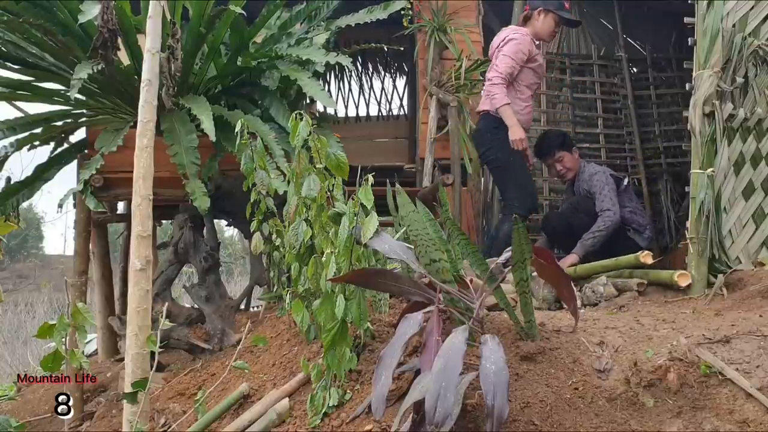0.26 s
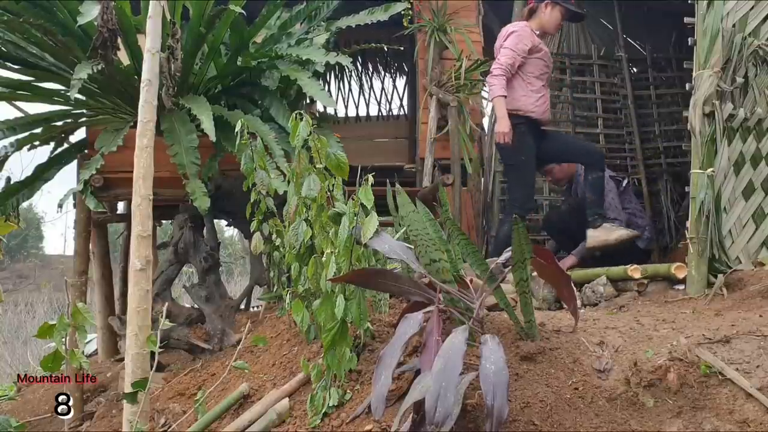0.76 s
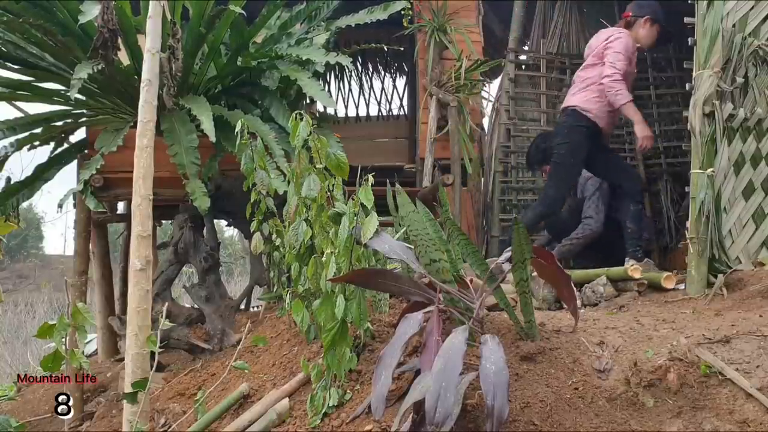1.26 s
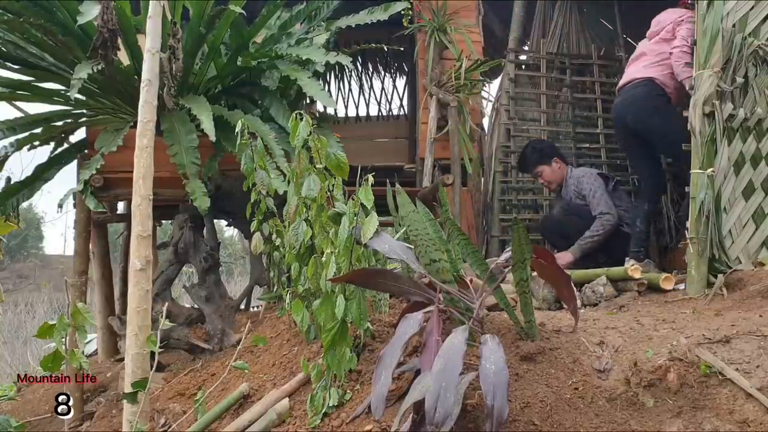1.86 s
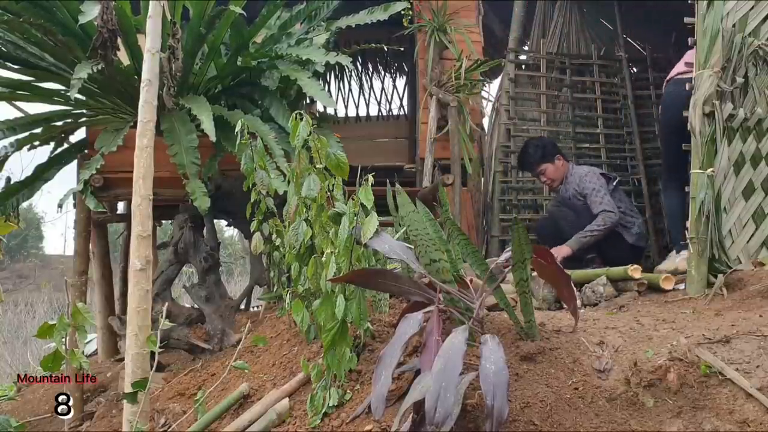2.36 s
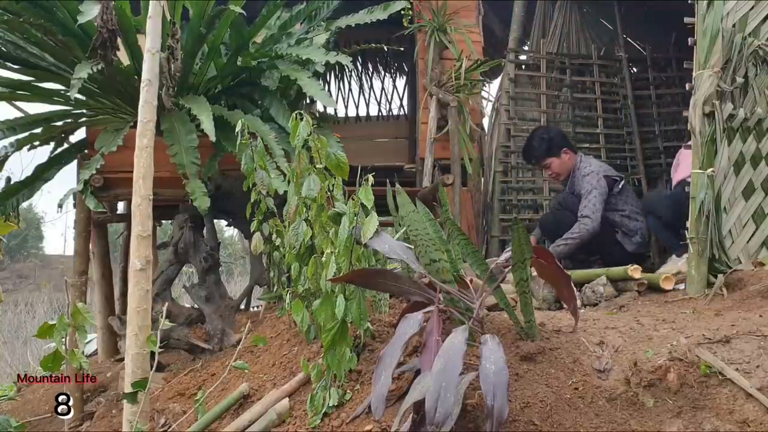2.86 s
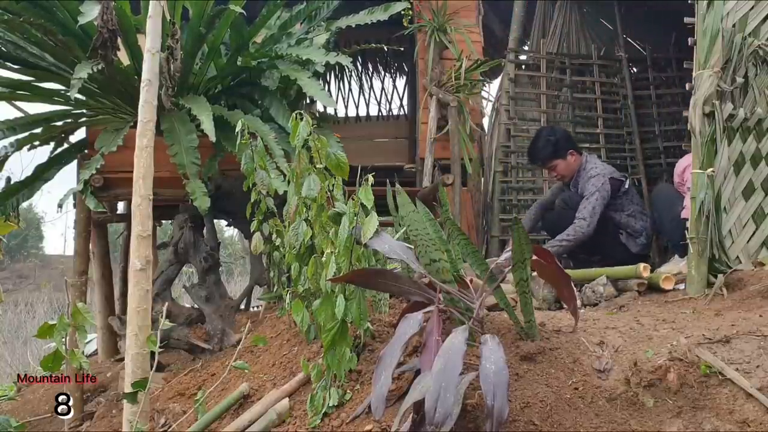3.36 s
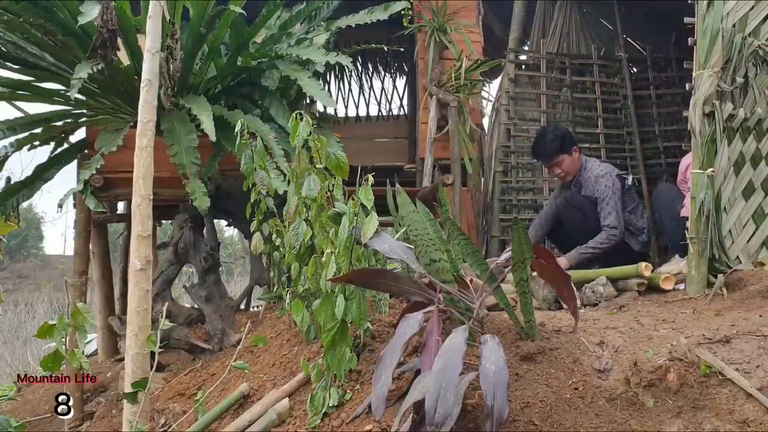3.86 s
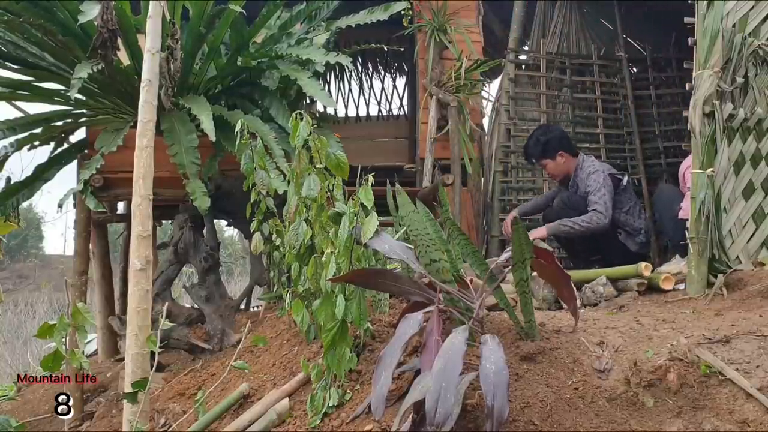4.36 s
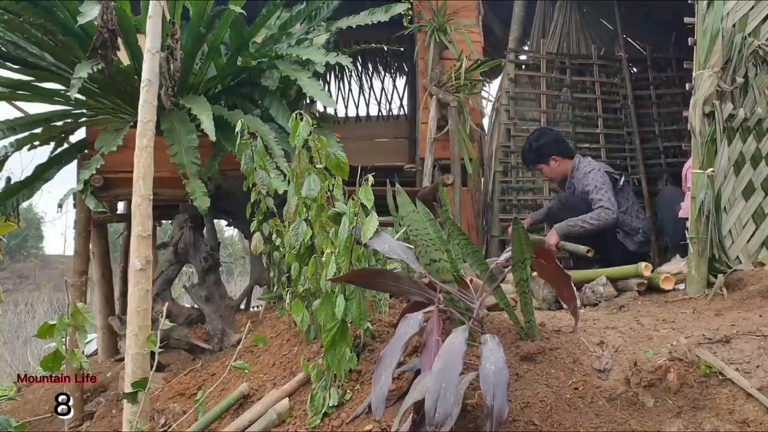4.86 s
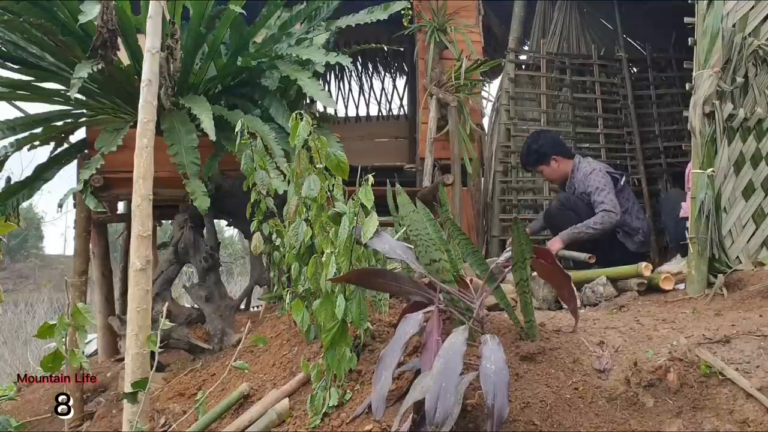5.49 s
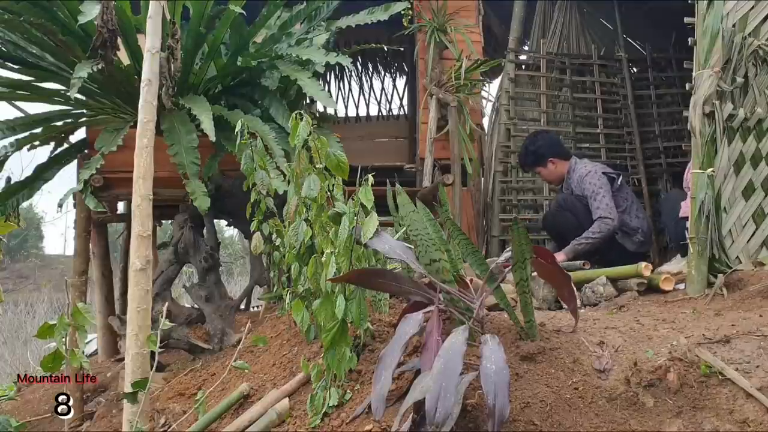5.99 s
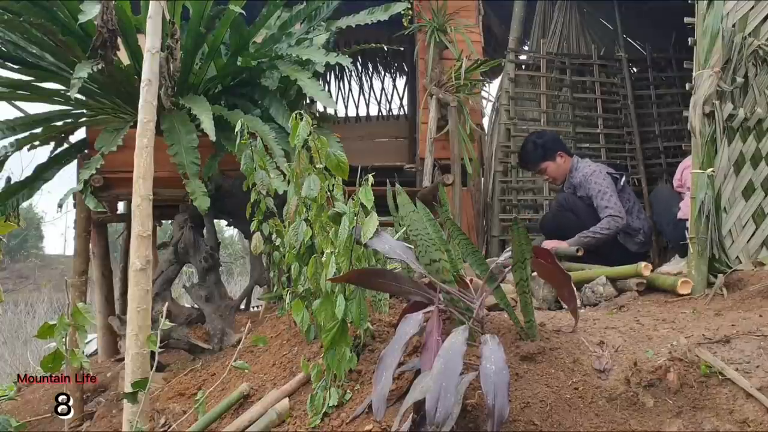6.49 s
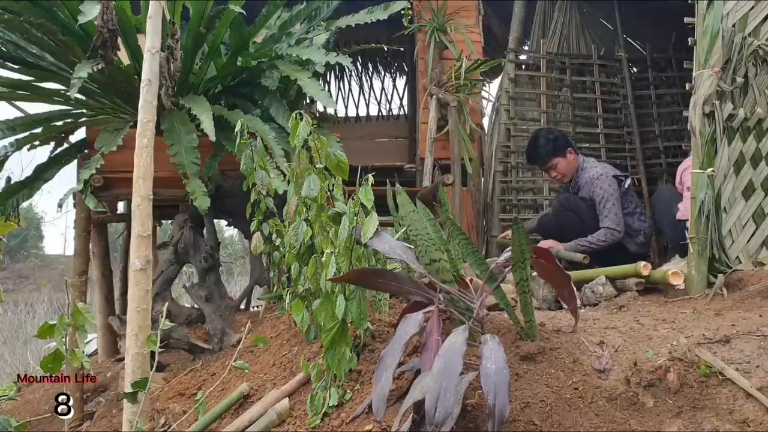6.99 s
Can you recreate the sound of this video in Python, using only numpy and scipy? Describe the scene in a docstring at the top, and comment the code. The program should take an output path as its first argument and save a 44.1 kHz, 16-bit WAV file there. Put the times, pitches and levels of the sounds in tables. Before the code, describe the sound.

A steady crackling, hissing patter like a small fire sits off to the right. A warbler trills at the start as hollow bamboo knocks and thumps on dry earth. A few lighter taps follow, then the hardest cluster of clacks and thuds at three and a half seconds. A second, softer trill comes next, then six very faint low hoots among final knocks. Open air, stereo phone microphone.

```python
"""A warbler trills over a crackling, hissing patter like a small fire, off to the right all through.
Hollow bamboo tubes, ringing air columns with clacking walls, knock, drag and thump on dry earth from 0.2 s.
The hardest blows come near 3.5 s, then a second trill; six soft hoots follow from 5.1 s, among and before
the last knocks, to 7.1 s. Trills and hoots are gliding sines; coloured noise is a faint open-air rumble."""
import sys
import numpy as np
from scipy import signal
from scipy.fft import rfft, irfft, next_fast_len
from scipy.io import wavfile
from scipy.ndimage import uniform_filter1d

SR = 44100
rng = np.random.default_rng(int(sys.argv[2]) if len(sys.argv) > 2 else 0)


def unload_audio(sound):
    """Save the sound as a 16-bit wav file, at the path given as the first command line argument."""
    columns = np.transpose(np.atleast_2d(sound))
    # keep every value between -1 and 1, then stretch to whole-number steps
    steps = np.round(np.clip(columns, -1, 1) * 32767)
    wavfile.write(sys.argv[1], SR, steps.astype(np.int16))


N = 318843
SNAP_T60_S = 0.01  # sharp head of a pop


def tube(name, modes, rattle_db, spread_oct, swell, mouth):
    """A blow rings the air column until gripped or laid still; contacts rattle it and clack the wall."""
    # blows: t/s, tube, level/dB, free ringing/s, favoured f/Hz
    knocks = [(0.169, "long", -45.5, 0.0039, 690), (0.179, "long", -39.5, 0.032, 930),
              (0.197, "long", -36.5, 0.011, 800), (0.202, "long", -40.5, 0.013, 420),
              (0.237, "long", -54.5, 0.034, 397), (0.553, "short", -39.5, 0.016, 520),
              (0.575, "short", -41, 0.033, 474), (0.742, "long", -67, 0.022, 387),
              (1.312, "long", -49, 0.076, 390), (2.467, "long", -60.5, 0.0057, 211),
              (3.462, "short", -30.5, 0.053, 754), (3.52, "short", -41, 0.035, 480),
              (3.551, "short", -34.5, 0.02, 960), (3.559, "short", -31.5, 0.044, 580),
              (3.622, "short", -36.5, 0.031, 800), (3.657, "short", -37, 0.02, 570),
              (3.684, "short", -41, 0.03, 515), (3.725, "short", -52.5, 0.033, 586),
              (5.864, "long", -50, 0.023, 536), (6.334, "long", -45.5, 0.046, 505),
              (6.407, "long", -62.5, 0.03, 410), (6.447, "long", -49.5, 0.033, 960),
              (6.476, "long", -62, 0.007, 426), (7.097, "short", -42, 0.027, 615),
              (7.105, "long", -50, 0.084, 614)]
    # woody clack between the modes: f/Hz, relative gain/dB
    wall_colour = [(60, -13), (250, -10), (900, -12.5), (2500, -8.5), (5000, -10)]
    grip_cycles = 13  # a gripped mode falls to 1/e over this many cycles
    # clack relative to ring at a firm blow; gentler touches are more clack than ring
    firm_db, clack_at_firm_db, clack_db_per_db = -40, -9, 0.2754
    column, wall = np.zeros(N), np.zeros((2, N))
    t = np.arange(SR // 3) / SR
    for s, which, db, free_s, pitch_hz in knocks:
        if which != name:
            continue
        late = np.maximum(t - free_s, 0)
        touches = rng.standard_normal(len(t)) * (rng.random(len(t)) < 0.03)
        force = undb(rattle_db) * touches * (t < free_s) * np.exp(-t / 0.12)
        force[0] = 1
        shift_hz = np.interp(s + t, *np.transpose(mouth))
        bend = np.exp(2j * np.pi * np.cumsum(shift_hz) / SR)
        rise = np.minimum(t / (0.002 + swell * free_s), 1)  # a tube rolled down swells in
        ring = np.zeros(len(t))
        for hz, mode_db, t60 in modes:
            detune = 1 + 0.006 * rng.standard_normal()
            # place and hardness of the contact favour the modes near one pitch
            favour = undb(mode_db) / (1 + (np.log2(hz / pitch_hz) / spread_oct) ** 2)
            grip = np.exp(-late * hz / grip_cycles)
            ring += favour * resonate(force, hz * detune, t60, bend) * grip
        add(column, s, undb(db) * ring * rise)

        # a low knock is a soft, long push, so its clack is dull
        push = np.hanning(int(0.4 * SR / pitch_hz) + 3)
        rough = rng.standard_normal(len(t)) + 0.72 * rng.standard_normal((2, len(t)))
        rough *= np.exp(-t / 0.024) + 2.6 * np.exp(-late / 0.067 - t / 0.073)
        clack = signal.lfilter(push / push.sum(), [1], rough)
        clack_db = clack_at_firm_db + clack_db_per_db * (firm_db - db)
        add(wall, s, undb(db + clack_db) * rise * clack)
    return column + colour(wall, wall_colour)


def ground():
    """Dull thumps: a soft swing of the earth, about two cycles long, a little unlike at the two ports."""
    # feet and tubes on the earth: t/s, level/dB, f/Hz
    thuds = [(0.195, -31.5, 171), (1.41, -41, 52), (2.482, -61.5, 70.6), (3.482, -35, 68),
             (3.548, -36.5, 127), (3.552, -25.5, 287), (3.579, -39.5, 113.3), (3.679, -47, 131),
             (7.051, -49, 66.4), (7.072, -42, 69), (7.132, -40.5, 90)]
    out = np.zeros((2, N))
    for s, db, hz in thuds:
        turns = np.arange(SR // 5) / SR * hz
        swing = np.sin(2 * np.pi * turns + 0.1 * rng.standard_normal((2, 1)))
        add(out, s, undb(db) * swing * 8.2 * turns ** 2 * np.exp(-turns / 0.37))
    return out


def loud_pops():
    """Each pop is a noise snap with fading tails, plus its own short resonance."""
    # t/s, level/dB, resonance f/Hz
    crackles = [(0.596, -34, 9800), (0.832, -34.5, 11400), (1.0763, -41, 5460), (1.211, -43, 8950),
                (1.255, -34.5, 9800), (1.294, -38, 12200), (1.4654, -34, 7500), (1.591, -41, 6700),
                (1.9117, -38.5, 6040), (1.995, -31.5, 6500), (2.0862, -28, 5840), (2.2187, -46, 8900),
                (2.2656, -42, 5700), (2.3258, -39.5, 10700), (2.514, -33, 10500), (2.529, -37, 8050),
                (2.553, -30.5, 5300), (2.584, -38.5, 10100), (2.694, -37.5, 8900), (2.9618, -44, 10300),
                (3.012, -40.5, 11500), (3.1305, -39, 6700), (3.162, -37, 7200), (3.464, -35, 7200),
                (3.493, -36, 10700), (3.612, -35, 10800), (3.736, -44, 11200), (3.779, -43, 11500),
                (4.0926, -30, 5500), (4.158, -38, 5830), (4.1734, -38.5, 10100), (4.3436, -28.5, 4900),
                (4.4747, -33, 5200), (4.546, -41, 10100), (5.126, -38, 9300), (5.221, -34, 5240),
                (5.24, -30, 5200), (5.5118, -39.5, 7500), (5.6137, -35.5, 11600), (5.766, -40, 9000),
                (5.835, -44, 8000), (6.072, -42.5, 8030), (6.2545, -41, 9950), (6.333, -39.5, 7000),
                (6.4393, -44.5, 8900), (6.483, -33, 9800), (6.56, -40, 5000), (6.8285, -39, 9850),
                (6.978, -40.5, 9700)]
    out, size = np.zeros((2, N)), SR // 6
    shape = fade(size, SNAP_T60_S) + 0.4 * fade(size, 0.06) + 0.08 * fade(size, 0.3)
    for s, db, hz in crackles:
        burst = shape * (rng.standard_normal(size) * 0.72 + rng.standard_normal((2, size)) * 0.86)
        burst[:, :3] += 4.1 * np.array([1, -1, 0.3])
        ring = resonate(burst, hz, 12.0 / hz) / np.sqrt(SR / hz)  # t60 of 12 cycles
        add(out, s, undb(db) * (0.62 * burst + 0.51 * ring))
    return out


def deep_ticks():
    """Each tick is a pulse with a little noise, ringing one quickly damped mode."""
    # t/s, level/dB, mode f/Hz
    tick_hits = [(0.099, -46.5, 2520), (0.613, -36, 3400), (1.265, -44, 2540), (1.4686, -46, 2470),
                 (1.559, -41, 2760), (2.086, -32.5, 3250), (2.2193, -32.5, 2780), (2.327, -40, 2900),
                 (2.649, -37, 3660), (2.6765, -46, 2470), (3.606, -33.5, 2400), (3.6429, -30.5, 2200),
                 (4.094, -28, 2440), (4.281, -42.5, 2810), (5.027, -42.5, 2580), (5.221, -45.5, 2560),
                 (5.238, -36, 3300), (5.5143, -48, 2180), (6.273, -49.5, 2720), (6.29, -48.5, 2530),
                 (6.999, -43, 2780), (7.0206, -41.5, 2500), (7.055, -43, 2560)]
    out, size = np.zeros((2, N)), SR // 6
    for s, db, hz in tick_hits:
        noise = rng.standard_normal(size) * 0.07 + rng.standard_normal((2, size)) * 0.035
        burst = fade(size, 0.06) * noise
        burst[:, 0] += 1
        add(out, s, undb(db) * (resonate(burst, hz, 0.0055) + burst))
    return signal.sosfilt(signal.butter(3, 1500, "high", fs=SR, output="sos"), out)


def sizzle_and_rustle():
    """Steady noise swollen by small pops: a two-band sizzle and a rustle, both yet to be coloured."""
    # t/s, sizzle level/dB, deeper rustle level/dB
    levels = [(0.0, -59.5, -84.5), (2.76, -58.5, -80.5), (2.92, -63, -85), (3.34, -57.5, -85.5),
              (3.7, -56, -71.5), (4.29, -57, -79), (6.99, -59.5, -88.5), (7.23, -56, -85)]
    s, sizzle_db, rustle_db = np.transpose(levels)
    t = np.arange(N) / SR
    sizzle_level = undb(np.interp(t, s, sizzle_db))
    rustle_level = undb(np.interp(t, s, rustle_db))
    split = signal.butter(2, 7500, fs=SR, output="sos")
    low = signal.sosfilt(split, scattered(0.067))
    high = scattered(0.077)
    high = high - signal.sosfiltfilt(split, high)
    all_over = patter(100, 3.3, 0.016)
    # some small pops are only dull, some only sharp
    dull = low * (0.66 + 1.3 * all_over + 0.98 * patter(45, 5.8, 0.068))
    sharp = high * (0.5 + 1.25 * all_over + 1.9 * patter(45, 0.55, 0.049))
    rustle = (0.2 + all_over + 2.68 * patter(30, 5.96, 0.13)) * scattered(0.48)
    return sizzle_level * (dull + sharp), rustle_level * rustle


def fire():
    """Loud pops and deeper ticks over a patter of small pops, a sizzle and a rustle."""
    # pops and sizzle: f/Hz, relative gain/dB
    bright_colour = [(3000, -41), (4000, -14), (5500, -4), (6800, -5.5), (8500, -2.5), (15300, -4.5),
                     (15900, -51.5)]
    # rustle: f/Hz, relative gain/dB
    rustle_colour = [(1400, -19.5), (2200, -2), (2700, -6.5), (3600, 2), (5000, -18.5)]
    sizzle, rustle = sizzle_and_rustle()
    bright = colour(loud_pops() + sizzle, bright_colour)
    return bright + colour(rustle, rustle_colour) + deep_ticks()


def warbler():
    """Quick whistles sliding down at a steady pace, smeared by the trees."""
    # first note t/s, notes, level/dB, gain of the straight sound
    phrases = [(0.061, 11, -51, 1.1), (3.775, 12, -54.5, 0.85)]
    note_gap_s, last_lag_s = 0.1135, 0.017  # the last notes lag
    straight, sung = np.zeros(N), np.zeros(N)
    t = np.arange(int(0.025 * SR)) / SR
    for first_s, count, phrase_db, share in phrases:
        starts = first_s + note_gap_s * np.arange(count) + last_lag_s * np.linspace(0, 1, count) ** 6
        for s in starts:
            hz = (6680 - 104000 * t) * (1 + 0.0092 * rng.standard_normal())
            flutter_db = 20 * uniform_filter1d(rng.standard_normal(len(t)), 60)
            db = phrase_db - 150 * t + 1.2 * rng.standard_normal() + flutter_db
            edges = np.hanning(len(t)) ** 0.022
            note = undb(db) * edges * np.sin(2 * np.pi * np.cumsum(hz) / SR)
            s = s + 0.0012 * rng.standard_normal()
            add(sung, s, note)
            add(straight, s, share * note)
    trees = rng.standard_normal((2, 20000)) * fade(20000, 0.35)
    return straight + 0.043 * signal.fftconvolve(sung[None], trees, axes=1)[:, :N]


def hoots(level_db):
    """A far bird's soft low notes at an even pace; each sags, wavers and sits below the last."""
    start_s, gap_s, count = 5.115, 0.291, 6
    nominal_hz, sink_hz = 334, 5.8  # sink per hoot
    out = np.zeros(N)
    t = np.arange(int(0.105 * SR)) / SR
    for k in range(count):
        waver = uniform_filter1d(rng.standard_normal(len(t)), 600)
        hz = (nominal_hz - k * sink_hz) * (1.02 - 0.21 * t + waver)
        tone = np.sin(2 * np.pi * np.cumsum(hz) / SR)
        add(out, start_s + k * gap_s, undb(level_db) * np.sin(np.pi * t / t[-1]) * tone)
    return out


def air():
    """Faint open-air rumble: coloured noise, mostly unlike at the two ports."""
    # f/Hz, relative gain/dB
    air_colour = [(15, -41), (25, 2), (80, 4), (238, -4.5), (391, -4), (1530, -12.5), (2360, -3.5),
                  (3500, -14), (4550, -67), (7700, -120)]
    return undb(-74) * colour(scattered(0.13), air_colour)


def scattered(alike):
    """Noise for both ports, only partly alike because leaves and posts scatter it."""
    shared, left, right = rng.standard_normal((3, N))
    alike = np.clip(alike, 0, 1)
    return np.sqrt(alike) * shared + np.sqrt(1 - alike) * np.array([left, right])


def patter(rate_per_s, spread_db, t60):
    """Envelope of small random pops, each with a sharp head."""
    size_db = spread_db * np.minimum(rng.exponential(size=N), 2.2)
    hits = (rng.random(N) < rate_per_s / SR) * undb(size_db)
    return signal.fftconvolve(hits, fade(3000, t60) + 0.22 * fade(3000, SNAP_T60_S / 2))[:N]


def resonate(x, hz, t60, bend=1):
    """One decaying mode; a unit pulse rings at size 1; bend turns its phase as it rings."""
    pole = np.exp(2j * np.pi * hz / SR - np.log(1000) / (t60 * SR))
    return (bend * signal.lfilter([1], [1, -pole], x)).imag


def fade(size, t60):
    """Exponential decay by 60 dB in t60 seconds."""
    return np.exp(-np.log(1000) * np.arange(size) / SR / t60)


def colour(x, points):
    """Minimum-phase filter through (f/Hz, gain/dB) points: rings only after a hit; rms gain 1 on white noise."""
    hz, db = np.transpose(points)
    size = 2 * next_fast_len(N // 2 + 1)
    log_hz = np.log(np.fft.rfftfreq(size, 1 / SR) + 1)
    gain = undb(np.interp(log_hz, np.log(hz), db))
    cepstrum = irfft(np.log(gain / np.sqrt(np.mean(gain ** 2))), size)
    fold = cepstrum * np.where(np.arange(size) < size // 2, 2, 0)
    fold[0] /= 2
    return irfft(rfft(x, size) * np.exp(rfft(fold)), size)[..., :N]


def undb(db):
    """Amplitude of a level in dB."""
    return 10 ** (np.asarray(db) / 20)


def add(out, s, x):
    """Mixes x into out from second s."""
    i = int(s * SR)
    out[..., i:i + x.shape[-1]] += x[..., :N - i]


def ports(left, right, lag_samples, left_db, shade):
    """The left port hears a source late, its treble shaded by the phone; shade is the treble share kept."""
    soft = signal.sosfiltfilt(signal.butter(3, 6800, fs=SR, output="sos"), left)
    shaded = shade * left + (1 - shade) * soft
    return np.array([undb(left_db) * np.roll(shaded, lag_samples), right])


def scene():
    """Bamboo, fire and warbler placed at the two ports, with thuds, hoots and air."""
    # air-column modes: f/Hz, level/dB, t60/s
    short_modes = [(265, 2, 0.11), (497.5, -0.5, 1), (706.4, -7.5, 1), (930, -11.5, 0.11), (1225, 6, 0.1),
                   (1412, 7.5, 0.079), (1585, -1, 0.07)]
    long_modes = [(171, 8, 0.089), (416.7, 5, 0.14), (597, -3, 0.7), (834, -0.5, 0.084), (960, -4, 0.14),
                  (1204, -6, 0.28), (1630, 0, 0.06)]
    # short tube's pitch shift as its mouth nears or leaves the earth: t/s, shift/Hz
    mouth_shift = [(0.59, -9), (0.67, 13.5), (3.5, -15), (3.545, -9.5), (3.62, 9.5), (3.7, -9.5),
                   (3.74, 14), (7.1, -4)]
    bamboo = tube("short", short_modes, rattle_db=-21, spread_oct=0.5, swell=0.1, mouth=mouth_shift)
    bamboo = bamboo + tube("long", long_modes, rattle_db=-24, spread_oct=0.35, swell=0.25, mouth=[(0, 0)])
    near = ports(*bamboo, lag_samples=5, left_db=1.5, shade=0.25)
    crackle = ports(*fire(), lag_samples=17, left_db=-0.5, shade=0.47)
    bird = ports(*warbler(), lag_samples=8, left_db=2.5, shade=0.52)
    return near + crackle + bird + ground() + hoots(-75.0) + air()


def record(dry):
    """The phone thins the deepest bass and cuts the top steeply."""
    low_hz, top_hz = 42, 16700
    thin = signal.sosfilt(signal.butter(2, low_hz, "high", fs=SR, output="sos"), dry)
    return signal.sosfilt(signal.ellip(10, 0.2, 80, top_hz, fs=SR, output="sos"), thin)


dry = scene()
out = record(dry)
unload_audio(out)
```